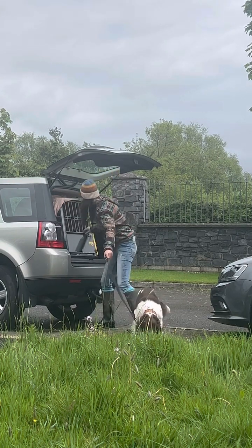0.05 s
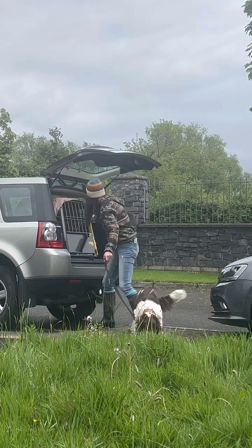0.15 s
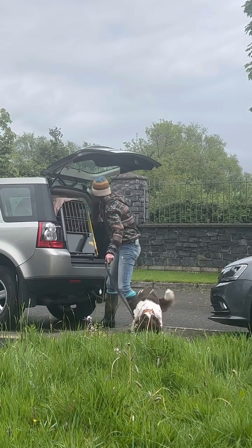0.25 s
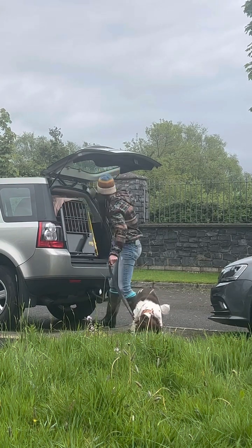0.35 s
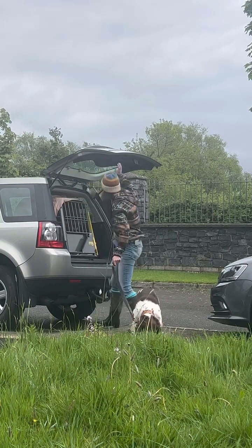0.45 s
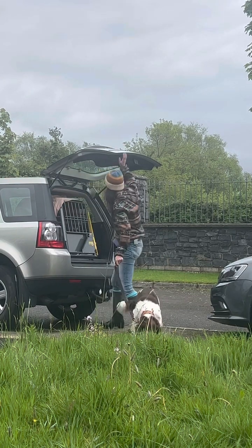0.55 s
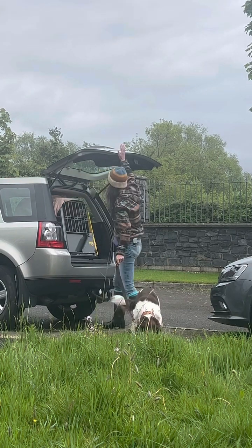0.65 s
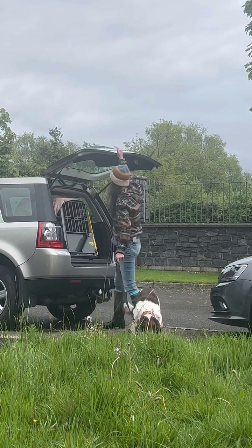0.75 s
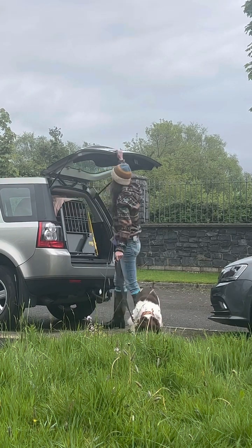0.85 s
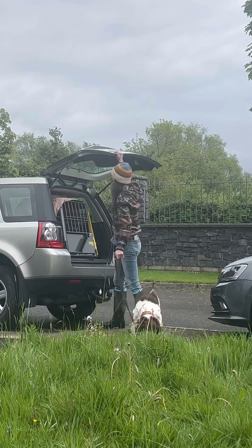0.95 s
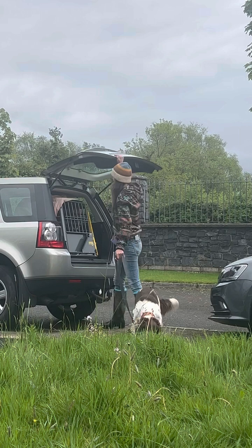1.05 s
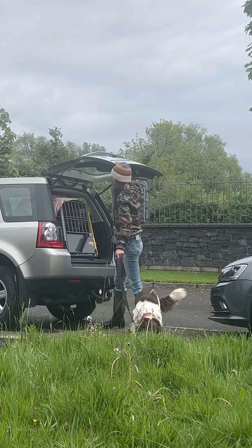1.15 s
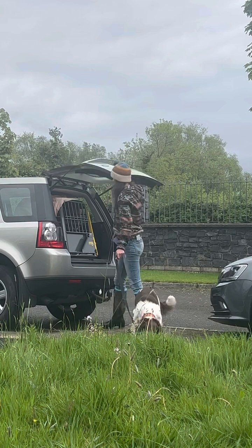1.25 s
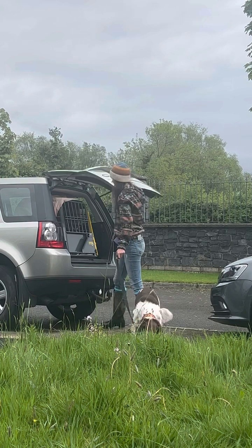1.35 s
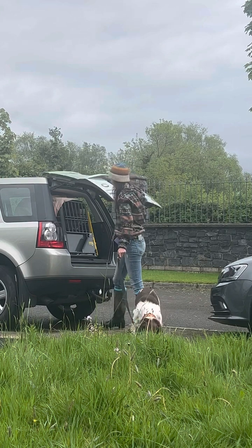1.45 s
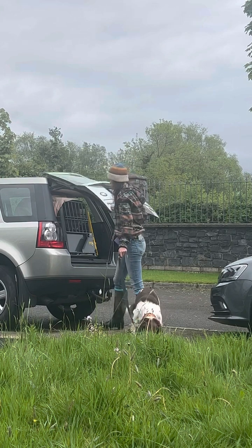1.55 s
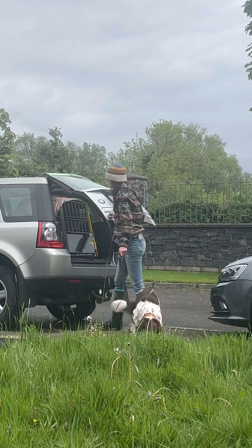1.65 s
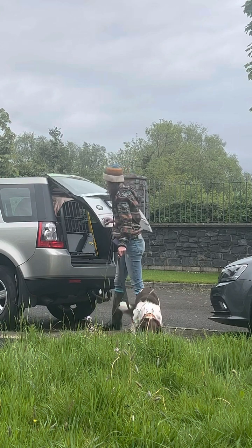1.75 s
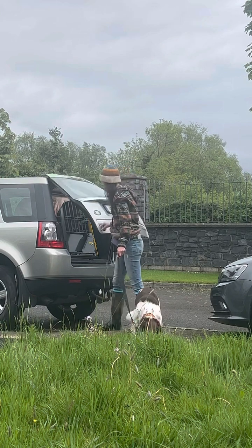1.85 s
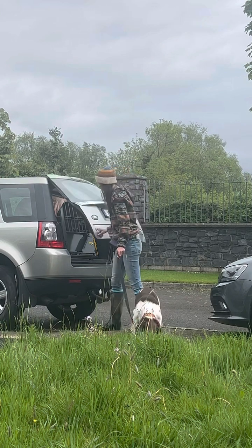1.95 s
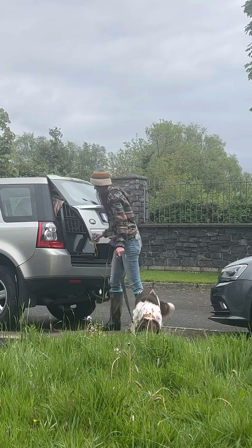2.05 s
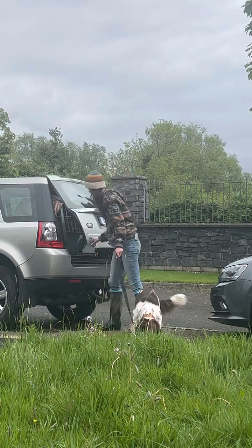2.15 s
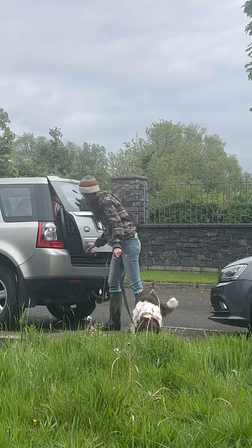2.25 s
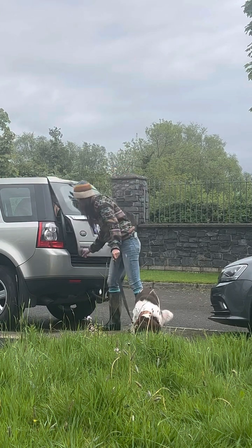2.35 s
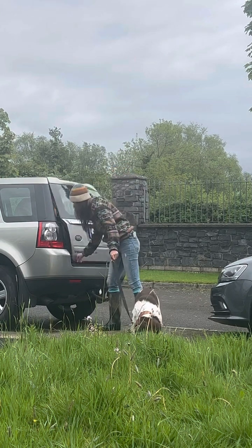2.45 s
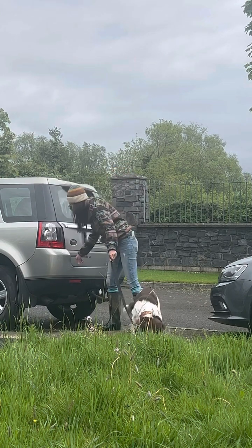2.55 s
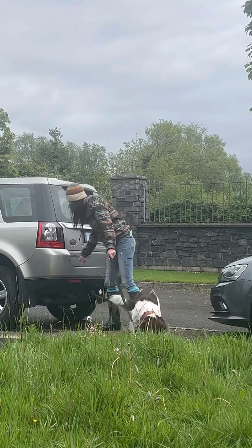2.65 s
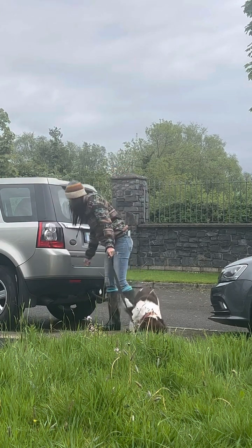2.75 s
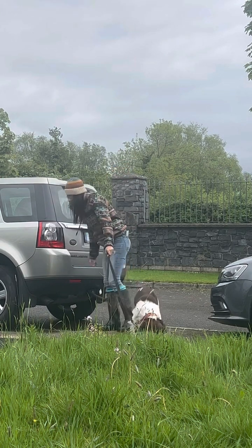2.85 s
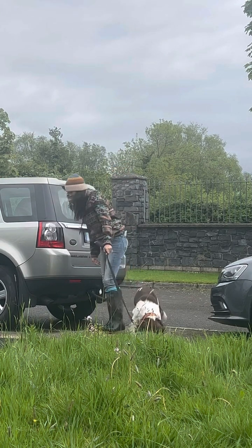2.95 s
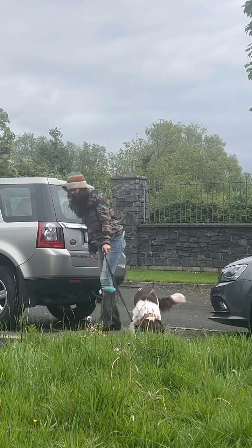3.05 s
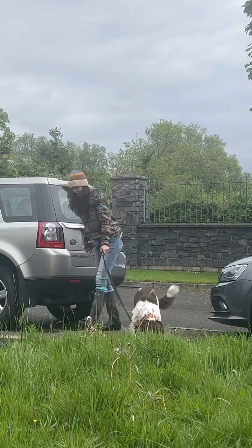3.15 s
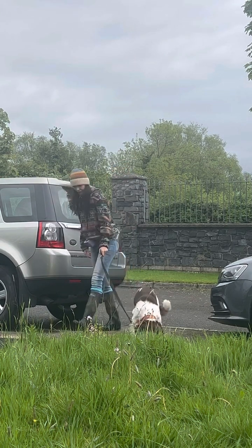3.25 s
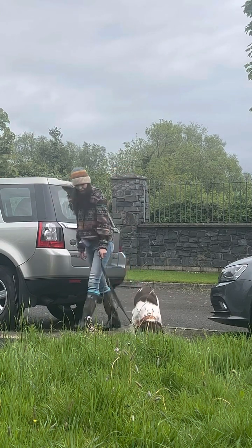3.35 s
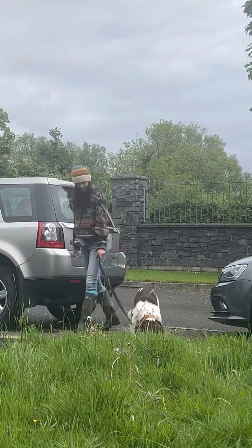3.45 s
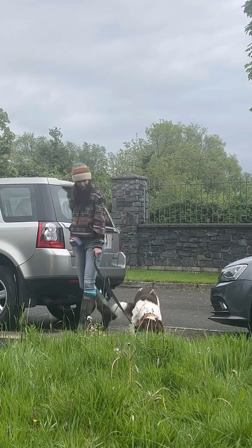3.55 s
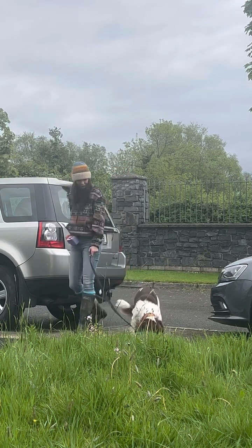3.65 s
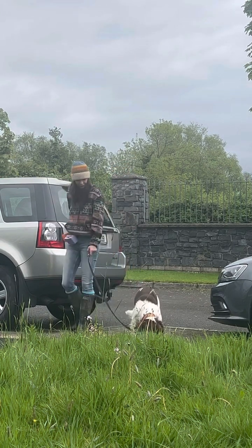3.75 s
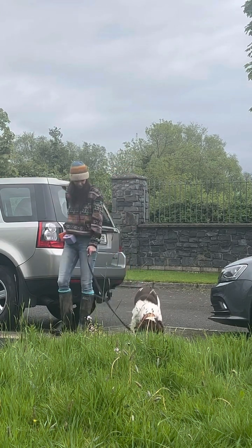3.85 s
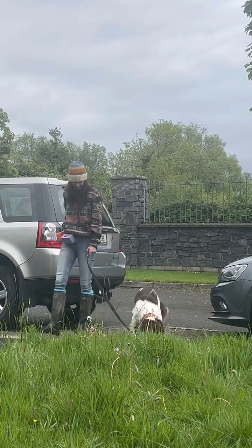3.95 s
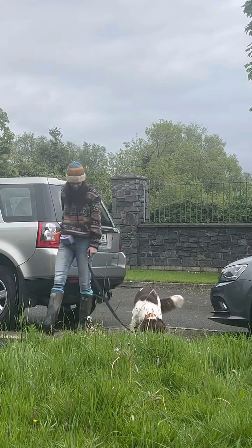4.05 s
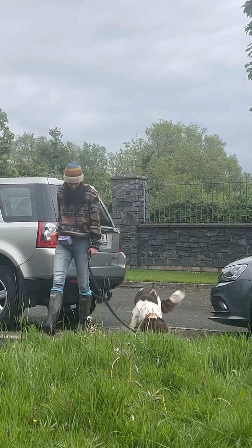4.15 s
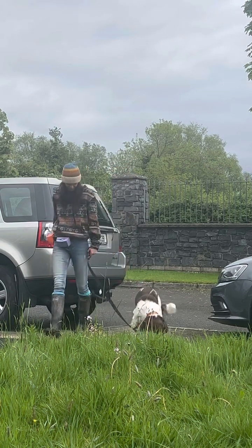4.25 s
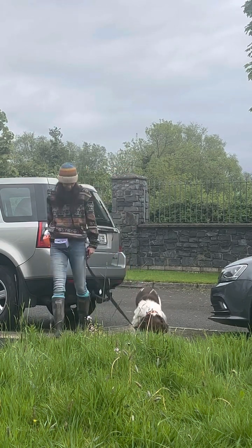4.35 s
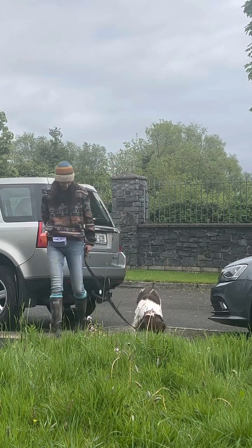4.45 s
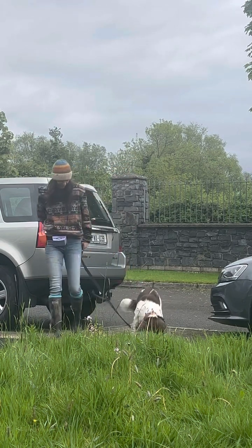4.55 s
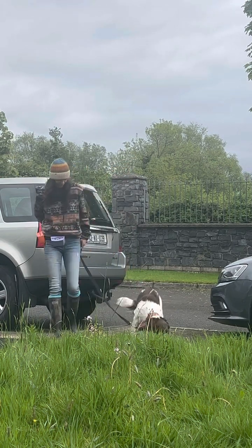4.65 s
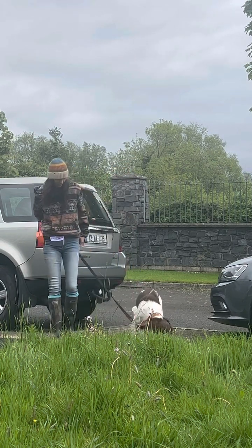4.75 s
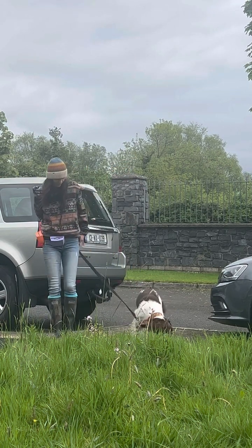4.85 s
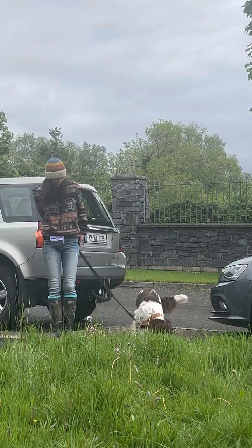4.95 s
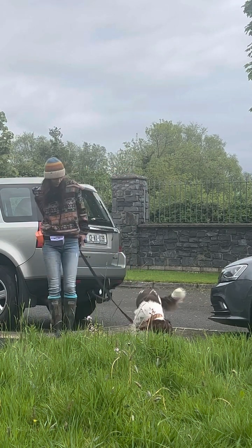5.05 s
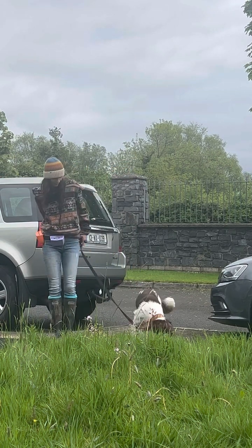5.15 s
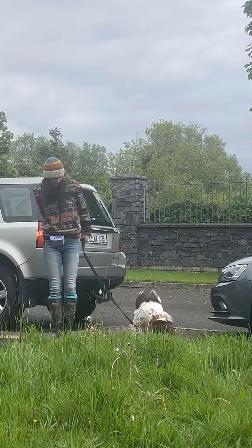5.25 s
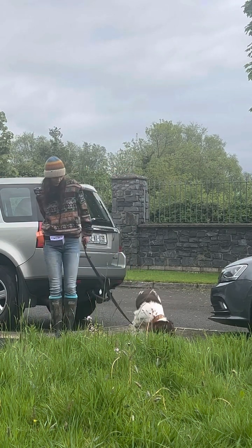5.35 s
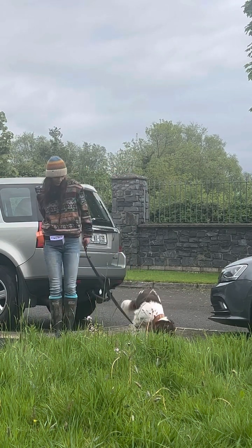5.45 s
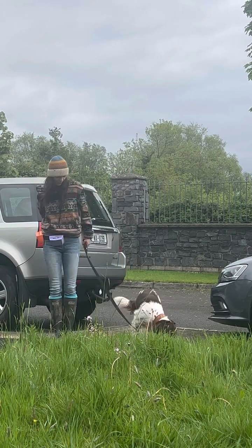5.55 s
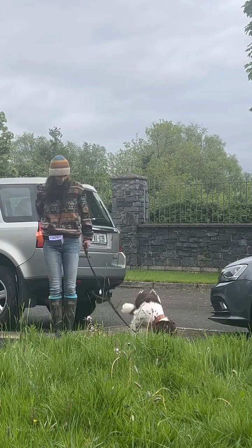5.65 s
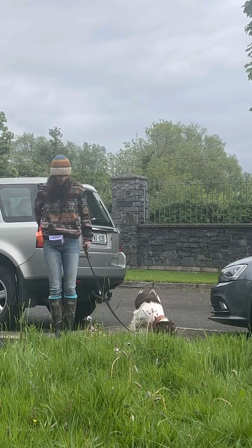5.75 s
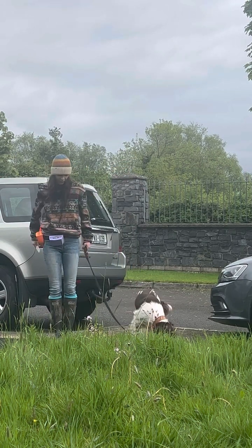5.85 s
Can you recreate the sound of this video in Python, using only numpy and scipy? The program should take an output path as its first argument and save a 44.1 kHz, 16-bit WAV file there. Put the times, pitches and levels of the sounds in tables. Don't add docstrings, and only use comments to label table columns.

```python
import sys
import numpy as np
from scipy import signal
from scipy.fft import rfft, irfft
from scipy.io import wavfile
from scipy.ndimage import uniform_filter1d

SR = 44100
rng = np.random.default_rng(int(sys.argv[2]) if len(sys.argv) > 2 else 0)


def decibels_to_gain(level_db):
    exponent = np.asarray(level_db, float) / 20
    return 10 ** exponent


def generate_wav(signal):
    frames = np.transpose(np.atleast_2d(signal))
    scaled = np.clip(frames, -1, 1) * 32767
    pcm = np.round(scaled).astype(np.int16)
    wavfile.write(sys.argv[1], SR, pcm)


N = 260190


def evened(x):
    return x / np.sqrt(np.mean(x ** 2) + 1e-20)


def read(points, hz):
    f, value = np.transpose(points)
    return np.interp(np.log(hz + 1), np.log(f + 1), value)


def curve(rows, t, count):
    rows = np.asarray(rows)
    return np.interp(t, rows[:, 0], rows[:, count])


def add(mix, s, sound):
    part = mix[..., round(s * SR):][..., :sound.shape[-1]]
    part += sound[..., :part.shape[-1]]


def panned(x, db):
    return x * decibels_to_gain(np.array([[db / 2], [-db / 2]]))


def coloured(x, points):
    size = x.shape[-1]
    gain_db = read(points, np.fft.rfftfreq(size, 1 / SR))
    return irfft(rfft(x) * decibels_to_gain(gain_db), size)


# frequency in Hz, coherence from 0 to 1.
COHERENCE = [(60, 1), (180, 1), (520, 0.77), (1500, 0.82), (4500, 0.52), (13000, 0.28)]
# frequency in Hz, lead of the left port in radians.
PORT_LEAD = [(140, -0.19), (600, -1.5), (950, -1.5), (1550, -0.65), (1980, 0.4), (2930, -2), (3270, -2),
             (3530, -1.33), (5170, -2), (5860, -1), (6550, -1.2), (9820, -1), (12100, -3.5), (13400, 2)]


def noise(gain, size, patchy_db, near=0):
    hz = np.fft.rfftfreq(size, 1 / SR)
    a, b, c, d, patches = rng.standard_normal((4 * N // size + 5, len(hz), 5)).T
    patches = uniform_filter1d(patches, size // 100, 0)
    patches = evened(uniform_filter1d(patches, size=12, axis=1))
    same = np.clip(read(COHERENCE, hz) + near, 0, 1)[:, None]
    lag = np.exp(-1j * read(PORT_LEAD, hz) * np.clip(1 - 2.5 * near, 0, 1))[:, None]
    left = a + 1j * b
    right = same * lag * left + np.sqrt(1 - same ** 2) * (c + 1j * d)
    z = np.array([left, right]) * gain(hz)[:, None] * decibels_to_gain(patchy_db * patches)
    return evened(signal.istft(z, nperseg=size, noverlap=3 * size // 4)[1][:, :N])


def shaped_noise(spectrum, size, patchy_db, near=0):
    return noise(lambda hz: decibels_to_gain(read(spectrum, hz)), size, patchy_db, near)


def band_bursts(rows):
    out = np.zeros((2, N))
    bins_hz = np.fft.rfftfreq(SR // 2, 1 / SR)
    for s, length, db, hz, width in rows:
        grit = rng.standard_normal((2, SR // 2))
        grit = grit + (1 + (300 / hz) ** 2) * grit[0]
        band = np.exp(-((bins_hz - hz) / width) ** 2)
        burst = evened(irfft(rfft(grit) * band))[:, :round(length * SR)]
        add(out, s, decibels_to_gain(db) * burst * signal.windows.tukey(burst.shape[1], .85))
    return out


# time in seconds, pitch in Hz, level in dB.
SQUEAL = [
    (2.478, 583, -73),
    (2.487, 585, -45),
    (2.495, 595.5, -38),
    (2.509, 576.5, -48.5),
    (2.524, 565, -37.5),
    (2.544, 550, -35),
    (2.56, 536.5, -36.5),
    (2.571, 500, -49.5),
    (2.585, 484, -52),
]


def squeal():
    t = np.arange(SQUEAL[0][0], SQUEAL[-1][0], 1 / SR)
    hz, db = curve(SQUEAL, t, count=1), curve(SQUEAL, t, count=2)
    turn = 2 * np.pi * np.cumsum(hz) / SR
    octave_db = -18.5 + 0.3075 * (585 - hz)
    tone = decibels_to_gain(db) * (np.sin(turn) + decibels_to_gain(octave_db) * np.sin(2 * turn))
    partials_db = (1.5, -1.0, -0.5, -5.0, -6.0)
    upper = sum(decibels_to_gain(part_db) * np.sin(k * turn) for k, part_db in enumerate(partials_db, 3))
    tone += decibels_to_gain(np.linspace(-60.5, -80, len(t))) * upper
    out = np.zeros(N)
    add(out, t[0], np.sqrt(2) * tone * signal.windows.tukey(len(t), .16))
    return out


# time in seconds, push level in dB, push length in seconds, latch tick level in dB.
BLOWS = [(2.563, -43, .008, -41), (2.574, -34, 0.0036, -33.5), (2.589, -20.5, 0.0033, -36),
         (2.634, -26, .003, -60), (2.688, -30, .003, -53), (2.582, -23.5, 0.0015, -32.5),
         (2.594, -7.5, 0.0043, -46), (2.607, -13, 0.0063, -50), (2.628, -24, 0.0051, -65),
         (2.644, -14.5, 0.0061, -60), (2.665, -16, 0.0053, -49), (2.681, -26.5, 0.0043, -48),
         (2.703, -23, 0.009, -72), (2.744, -34, 0.0041, -84), (2.801, -25, 0.015, -80),
         (2.879, -40, 0.0065, -72)]
# frequency in Hz, level in dB, 60 dB decay time in seconds.
BODY = [(43.5, -0.5, 0.26), (75.5, -4, 0.44), (101, -19, 0.16), (118.5, 5.5, 0.16), (144.3, -9.5, 0.33),
        (169.7, 3.5, 0.106), (194, 2.5, 0.21), (230.6, -4.5, 0.26), (286.5, -17, .15), (328.6, -2, 0.21),
        (353, -10.5, 0.24), (437, -18, 0.17), (528, -10, 0.2), (575, -21, .15), (714, -26, .12),
        (940, -20, 0.12), (1020, -29, .1), (1270, -34.5, .1)]
# frequency in Hz, level in dB per Hz.
RATTLE = [(880, -36), (1500, -11), (1800, -6), (2730, -2.5), (3950, -3.5), (5410, -16), (7750, -14.5),
          (9950, -25), (11000, -32), (13600, -41), (15500, -39)]


def slam():
    t = np.arange(SR // 2) / SR
    pushes, ticks, ring = np.zeros(N), np.zeros(N), np.zeros(len(t))
    for k, (hz, db, t60) in enumerate(BODY):
        ring += decibels_to_gain(db - 60 * t / t60) * np.sin(2 * np.pi * hz * t + np.pi * k)
    t = t[:900]
    for s, push_db, length, tick_db in BLOWS:
        push = t * np.exp(-t * 5.15 / length)
        add(pushes, s, decibels_to_gain(push_db) * push / push.sum())
        add(ticks, s, decibels_to_gain(tick_db) * rng.standard_normal(900) * np.exp(-t / 0.0077))
    return 0.42 * signal.fftconvolve(pushes, ring)[:N] + coloured(ticks, RATTLE)


# time in seconds, level in dB.
SHAKE = [
    (2.574, -43),
    (2.587, -22.5),
    (2.611, -33),
    (2.679, -38),
    (2.709, -47),
    (2.79, -55.5),
    (2.9, -65),
]
# frequency in Hz, level in dB per Hz.
PANELS = [(150, -39), (250, -5.5), (331, -1.5), (399, -19), (491, -7.5), (599, -16), (714, -20),
          (3000, -46.5), (3900, -85), (6600, -120)]


def shake():
    t = np.arange(N) / SR
    on = (t > SHAKE[0][0]) * np.clip((SHAKE[-1][0] - t) / 0.041, 0, 1)
    db = curve(SHAKE, t, count=1)
    panels = shaped_noise(PANELS, size=2048, patchy_db=3.0, near=0.3)
    grains = decibels_to_gain(0.91 * evened(uniform_filter1d(rng.standard_normal(N), size=120)))
    rattle = shaped_noise(RATTLE, size=256, patchy_db=5, near=0.11) * grains
    rattle *= t > 2.584
    rattle_db = 1.225 * db - 13.5
    return on * (panels * decibels_to_gain(db) + rattle * decibels_to_gain(rattle_db))


# frequency in Hz, left minus right level in dB.
CAR_SIDE = [(150, 0.1), (350, 1), (650, 6.5), (1200, 8), (2200, 1.5), (4000, 0.5)]


def placed_car(car):
    left = coloured(car[0], np.multiply(CAR_SIDE, [1, .5]))
    right = coloured(car[1], np.multiply(CAR_SIDE, [1, -.5]))
    return np.array([left, right])


# time in seconds, level in dB, frequency in Hz, 60 dB decay time in seconds.
STEPS = [
    (0.063, -44.5, 153, 0.079),
    (0.51, -40, 85, 0.037),
    (0.881, -50, 79.6, 0.086),
    (1.66, -46, 137, 0.057),
    (1.703, -40.5, 115, 0.051),
    (2.547, -41, 131, .1),
    (3.481, -37.5, 188, 0.053),
    (4.303, -43.5, 194, 0.074),
    (4.314, -40, 81.3, 0.1),
    (4.399, -39, 179, 0.062),
]
# start and length in seconds, level in dB, centre and width of the band in Hz.
SCUFFS = [(.5, 0.08, -58.5, 260, 1200), (0.505, 0.089, -73, 5700, 3700), (1.61, 0.15, -57.5, 470, 470),
          (1.62, 0.127, -53.5, 252, 73), (1.77, .15, -57.5, 210, 85), (4.14, 0.32, -60.5, 1320, 450),
          (4.3, .35, -70, 1150, 770), (5.2, .25, -74, 800, 40), (2.655, 0.034, -52.5, 1240, 140),
          (1.15, 0.59, -89.5, 9500, 3000), (4.4, 0.57, -69.5, 488, 17), (5.2, 0.24, -70.5, 810, 72),
          (2.5, 0.067, -75.5, 6400, 3600), (0.87, 0.26, -86, 5900, 360), (1.5, 0.12, -78, 5200, 510)]


def boots():
    t = np.arange(SR // 4) / SR
    out = band_bursts(SCUFFS)
    for s, db, hz, t60 in STEPS:
        envelope = decibels_to_gain(db + 7.0 - 60 * t / t60) * (1 - np.exp(-t / 0.0039))
        add(out, s, envelope * np.sin(2 * np.pi * hz * t))
    return out


# start and length in seconds, starting pitch in Hz, level in dB.
PIPER = [(.779, 0.069, 6140, -85), (.961, 0.15, 6170, -84), (1.186, 0.12, 6140, -85),
         (1.472, 0.11, 5660, -79.5), (2.105, .17, 5060, -78.5), (2.705, .17, 5950, -74),
         (3.587, 0.1, 6010, -72.5)]
SLIDER = [(1.9, .17, 7200, -85), (2.98, 0.068, 7920, -85)]
GLIDER = [(.15, 0.065, 4940, -79), (4.055, .235, 8530, -87)]
RISER = [(1.99, 0.06, 3400, -74), (2.165, 0.035, 3820, -70.5), (2.293, 0.064, 3455, -72.5),
         (3.527, 0.067, 5300, -95)]
WHIP = [(.214, 0.013, 5200, -76), (.393, 0.011, 3440, -73), (2.966, 0.013, 3430, -59),
        (3.076, 0.024, 3580, -60.5), (3.165, 0.0098, 3380, -59.5), (4.481, 0.028, 2930, -71),
        (3.268, 0.014, 2440, -69)]
FALLER = [(.179, 0.021, 2780, -69.5), (.49, 0.026, 3300, -71), (2.145, .03, 2610, -73),
          (2.396, 0.017, 3030, -69.5), (3.428, 0.081, 4950, -79), (3.63, 0.065, 4900, -91),
          (4.41, 0.021, 4060, -69), (4.428, 0.033, 4050, -63.5), (4.515, 0.019, 2840, -67),
          (4.67, 0.032, 3910, -67), (4.92, 0.019, 3720, -70.5), (2.915, 0.029, 4100, -64),
          (3.01, 0.027, 3370, -67)]
HEDGE = [(.323, 0.021, 3580, -71), (.335, 0.02, 3090, -72), (.442, 0.026, 3650, -71),
         (.79, 0.063, 2650, -75), (.794, 0.02, 2950, -76), (.827, 0.083, 3500, -68),
         (1.715, 0.068, 3603, -76.5), (1.85, 0.053, 3614, -77), (2.125, .05, 3610, -71.5),
         (2.228, .018, 3020, -72), (3.034, 0.047, 3130, -61.5), (3.008, .03, 3820, -73),
         (4.436, .018, 3440, -67), (4.69, 0.062, 3610, -79), (4.87, 0.023, 3600, -83),
         (4.922, 0.016, 3200, -72)]
FLUTER = [(.027, 0.043, 2797, -70), (.261, 0.015, 2610, -70.5), (.458, 0.043, 2500, -72.5),
          (.645, 0.057, 2496, -67), (1.13, .03, 2900, -78), (1.168, 0.042, 2670, -80),
          (.72, .013, 2500, -72), (.745, 0.014, 2120, -68), (.891, .015, 2180, -70.5),
          (2.172, 0.033, 2134, -72.5), (2.21, .04, 2130, -78), (2.786, 0.034, 2890, -69),
          (2.972, 0.014, 2890, -63), (3.172, 0.018, 3040, -62.5), (3.574, 0.037, 3530, -71),
          (3.697, 0.047, 3500, -73), (3.768, .038, 2100, -74), (4.304, 0.028, 3080, -67.5),
          (4.445, 0.075, 2900, -69.5), (4.955, 0.058, 2300, -77), (3.125, .05, 2350, -70),
          (3.185, 0.028, 2260, -73.5), (3.185, 0.032, 2840, -70.5), (4.755, 0.049, 2900, -73),
          (4.815, 0.052, 2690, -75), (4.955, .03, 2900, -74)]
THIN = [(5.145, .05, 2100, -78), (5.15, .055, 3150, -82), (5.15, .045, 2700, -83),
        (5.212, 0.059, 1950, -74), (5.262, 0.052, 2080, -73), (5.235, .035, 2890, -77),
        (5.295, 0.065, 3080, -78.5), (5.355, .07, 2055, -79), (5.44, .055, 2695, -74.5),
        (5.425, 0.11, 2550, -77), (5.495, .028, 2950, -75), (5.51, 0.058, 2133, -76),
        (5.575, 0.11, 2100, -71), (5.7, .06, 2120, -83), (5.757, 0.12, 2440, -75), (5.58, 0.054, 2750, -81)]


def stray_notes():
    s, length, hz, size = rng.random((70, 4)).T
    length = np.interp(length, (0, 1), (.012, .05))
    hz = np.interp(hz, (0, 1), (2100, 3800))
    return np.transpose([s * 5.0, length, hz, -78 - 8 * size])


def whistles():
    stray = stray_notes()
    # notes, glide in Hz a second, left minus right in dB, echo in dB.
    singers = [(PIPER, 30, 1.2, -1.5), (SLIDER, -1500, 1.2, 3), (GLIDER, -4300, -1.5, -5),
               (RISER, 9800, -16, -1.5), (WHIP, 66000, -8, -6), (FALLER, -14000, -1.2, -4),
               (HEDGE, -900, -11, -4), (FLUTER, -600, 1.3, -4), (THIN, -60, 1.3, -6),
               (stray[::2], -3000, -6, -3), (stray[1::2], 2500, 3, -3)]
    direct, far = np.zeros((2, N)), np.zeros(N)
    for notes, glide, side_db, echo_db in singers:
        for s, length, start_hz, db in notes:
            t = np.arange(round(length * SR)) / SR
            flutter = evened(uniform_filter1d(rng.standard_normal(SR // 4), size=300))[:len(t)]
            hz = start_hz + glide * t * (1.7 - 0.7 * t / length)
            hz = hz + .007 * start_hz * flutter[::-1]
            turn = 2 * np.pi * np.cumsum(hz) / SR
            note = decibels_to_gain(db + 2.5 + 3.5 * flutter) * np.sin(turn) * signal.windows.tukey(len(t), .7)
            add(direct, s, panned(note, side_db))
            add(far, s, decibels_to_gain(echo_db) * note)
    return direct, far


# start and length in seconds, lowest pitch at start and at end in Hz, echo level in dB.
NEAR_TRILLS = [
    (0.48, .185, 4120, 3560, -61.5),
    (2.445, 0.15, 4125, 3840, -62),
]
FAR_TRILLS = [
    (1.0, .25, 3860, 3400, -68),
    (2.738, 0.27, 3716, 3337, -67),
    (3.958, 0.18, 3800, 3203, -69),
    (4.685, 0.15, 4194, 2500, -69.5),
]


def trills():
    near, far = np.zeros(N), np.zeros(N)
    # trills, direct sound over the echo in dB, fade of the leap tops by the end in dB.
    for rows, direct_db, end_db in ((NEAR_TRILLS, 6, -18), (FAR_TRILLS, -3.5, -7)):
        for s, length, from_hz, to_hz, echo_db in rows:
            count = round(length * SR)
            t = np.arange(count) / SR
            wobble = evened(uniform_filter1d(rng.standard_normal(count), size=900))
            rough = evened(uniform_filter1d(rng.standard_normal(count), size=150))
            leap = (.5 - .5 * np.cos(2 * np.pi * 77.0 * t + .35 * wobble)) ** 1.3
            hz = np.linspace(from_hz, to_hz, count) + np.linspace(1450.0, 850.0, count) * leap
            tilt_db = np.linspace(-3.0, end_db, count) * leap + np.linspace(-3.0, 1.5, count)
            song = np.sqrt(2) * decibels_to_gain(tilt_db + 2.5 * rough) * np.sin(2 * np.pi * np.cumsum(hz) / SR)
            song = song * signal.windows.tukey(count, .3)
            add(near, s, decibels_to_gain(echo_db + direct_db) * song)
            add(near, s + .0045, decibels_to_gain(echo_db + direct_db - 8) * song)
            add(far, s, decibels_to_gain(echo_db) * song)
    return near, far


# start and end in seconds, falling chips a second, top and bottom pitch in Hz, level in dB.
CHATTER = (1.519, 2.15, 11.75, 4950, 3950, -70)


def chatter():
    start, end, rate, top_hz, bottom_hz, db = CHATTER
    out = np.zeros(N)
    hz = np.linspace(top_hz, bottom_hz, 600)
    chip = np.sin(2 * np.pi * np.cumsum(hz) / SR) * np.hanning(600)
    for s in np.arange(start, end, 1 / rate):
        add(out, s, decibels_to_gain(db) * chip)
        add(out, s + 0.016, decibels_to_gain(db - 8.0) * chip)
    return out


# frequency in Hz, 60 dB decay time in seconds.
YARD = [(100, 0.22), (600, 0.36), (3000, 0.46), (8000, 0.18)]


def yard(x):
    taps = np.zeros((2, SR))
    at = np.arange(300, SR - 20, 20) + rng.integers(0, 20, (2, (SR - 301) // 20))
    np.put_along_axis(taps, at, rng.choice([-1., 1.], at.shape), 1)
    hz, t, z = signal.stft(taps, SR, nperseg=256)
    decay = decibels_to_gain(-60 * t / read(YARD, hz)[:, None])
    tail = signal.istft(z * decay, SR, nperseg=256)[1]
    return signal.fftconvolve(x[None], tail / np.linalg.norm(tail[0]), axes=1)[:, :N]


# start and length in seconds, level in dB,
# centre and width of the band in Hz.
TICKS = [
    (3.912, .008, -79, 10000, 8000),
    (4.6, .008, -86, 11000, 6000),
    (.222, .008, -80, 4500, 2500),
    (2.584, .009, -72, 15300, 900),
    (2.598, .006, -80, 15300, 700),
]


def snaps():
    return band_bursts(TICKS)


# start and length in seconds, level in dB, centre and width of the band in Hz.
HAZE = [(3.7, .14, -80, 6300, 900), (3.85, .15, -81, 6000, 700), (4.02, .1, -79.5, 6100, 1100),
        (4.27, .2, -84, 5750, 400), (3.01, .09, -80, 7400, 500), (.94, .14, -82, 5800, 450),
        (1.17, .13, -83, 5900, 400), (1.89, .2, -83, 7050, 350)]


def haze():
    return band_bursts(HAZE)


# frequency in Hz, level in dB per Hz.
CHORUS = [(1180, -34), (2000, -13.5), (2170, -16.5), (2810, -6.5), (3020, -0.5), (3330, 0), (3640, -0.5),
          (4750, -7.5), (5160, -11.5), (5350, -18), (6000, -18.5), (7800, -45), (13200, -120)]
# time in seconds, level in dB.
BUSY = [(0, -82), (.9, -71), (1.5, -77.5), (2.05, -82), (2.3, -68.5), (3.2, -68), (3.63, -70.5),
        (3.8, -74.5), (4.4, -74), (5.3, -81.5), (5.9, -100)]


def chorus():
    t = np.arange(N) / SR
    level = decibels_to_gain(curve(BUSY, t, count=1))
    for s, *_, echo_db in NEAR_TRILLS + FAR_TRILLS:
        age = np.maximum(t - s, 0) / 0.054
        level += decibels_to_gain(echo_db - 2) * age * np.exp(1 - age)
    return level * shaped_noise(CHORUS, size=256, patchy_db=4.5)


# start and length in seconds, level in dB, centre and width of the band in Hz.
SURGES = [
    (1.202, 0.18, -48.5, 64.6, 10),
    (1.8, 0.22, -51, 57.41, 10),
    (1.88, 0.23, -57, 66.96, 7.2),
    (2.17, 0.16, -50.5, 67.5, 13),
]


def lorry():
    return band_bursts(SURGES)


# frequency in Hz, level in dB per Hz.
RUMBLE = [(11, -43.5), (18, -33), (45, -6.5), (65, 4.5), (130, -7.5), (184, -9.5), (312, -18.5), (379, -23),
          (500, -28.5), (650, -38), (1100, -120)]
# frequency in Hz, width in Hz, level in dB.
HUM = [(883, 71, 2), (1055.5, 39, -1), (1260, 49, -6), (1450, 60, -8.5), (674, 122, -6), (476.5, 75, -6.5)]
# time in seconds, level in dB.
TRAFFIC = [(0, -0.5), (.3, 1.5), (1, 3), (1.9, -3), (2.3, -2), (2.7, -2), (3.8, -1.8), (4.15, -3),
           (4.47, 4.5), (4.85, -7), (5.27, -0.5), (5.6, -3.5), (5.9, -1)]


def tyre_hum(hz):
    return sum(decibels_to_gain(db) / (1 + (2 * (hz - centre) / width) ** 2) for centre, width, db in HUM)


def traffic():
    t = np.arange(N) / SR
    cars_db = curve(TRAFFIC, t, count=1)
    after = t - 2.806
    heave = decibels_to_gain(-43.5 - 84 * np.maximum(after, 0)) * np.clip(1 + after / .12, 0, 1)
    low = decibels_to_gain(-52.5 + .2 * cars_db - 0.36 * t) + heave
    rumble = low * shaped_noise(RUMBLE, size=4096, patchy_db=1.0)
    return rumble + decibels_to_gain(-64.5 + cars_db) * noise(tyre_hum, size=2048, patchy_db=2.0)


# frequency in Hz, level in dB per Hz.
AIR = [(120, -31), (200, -2), (322, -12), (346, -21), (391, -15.5), (577, -12.5), (866, -4), (1370, -12),
       (2060, -13), (2250, -16), (2780, -14), (4240, -23.5), (13600, -40.5), (14300, -75)]


def air():
    return decibels_to_gain(-67.5) * shaped_noise(AIR, size=1024, patchy_db=2.5)


def scene():
    gate = squeal() + slam()
    car = placed_car(gate + shake())
    notes, ringing = whistles()
    near, far = trills()
    chips = chatter()
    high = signal.lfilter(*signal.butter(2, 300, "high", fs=SR), gate)
    echoes = yard(decibels_to_gain(-15.0) * high + ringing + far + decibels_to_gain(5.0) * chips)
    birds = notes + panned(near + chips, -2.5)
    background = snaps() + haze() + chorus() + lorry() + traffic() + air()
    return car + boots() + birds + echoes + background


def top_cut(x):
    return signal.sosfilt(signal.butter(12, 15800, fs=SR, output="sos"), x)


def record(dry):
    return top_cut(dry)


dry = scene()
out = record(dry)
generate_wav(out)
```